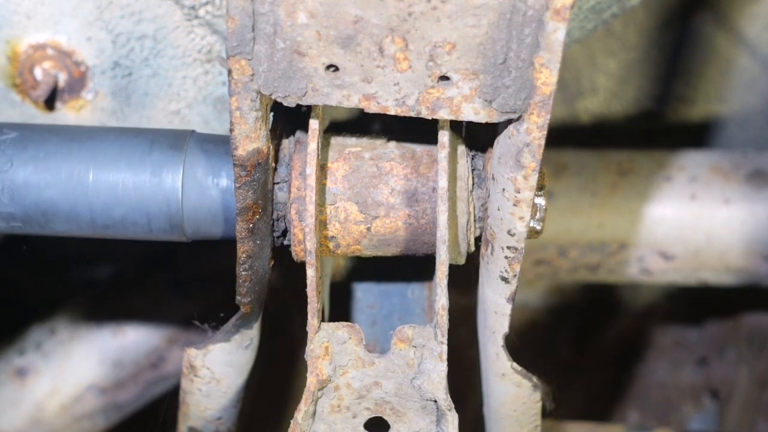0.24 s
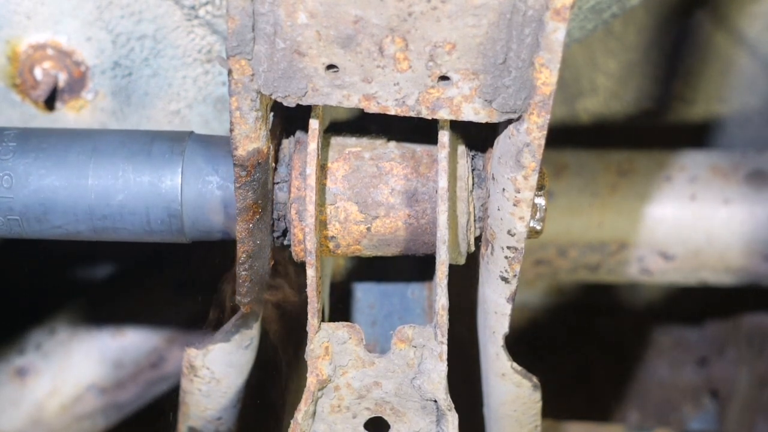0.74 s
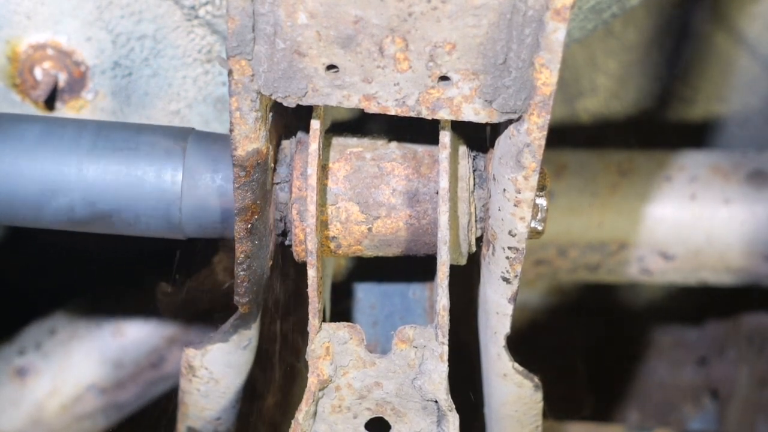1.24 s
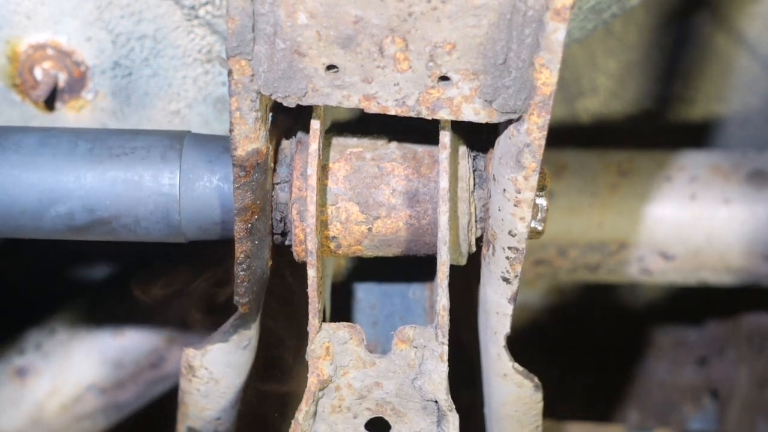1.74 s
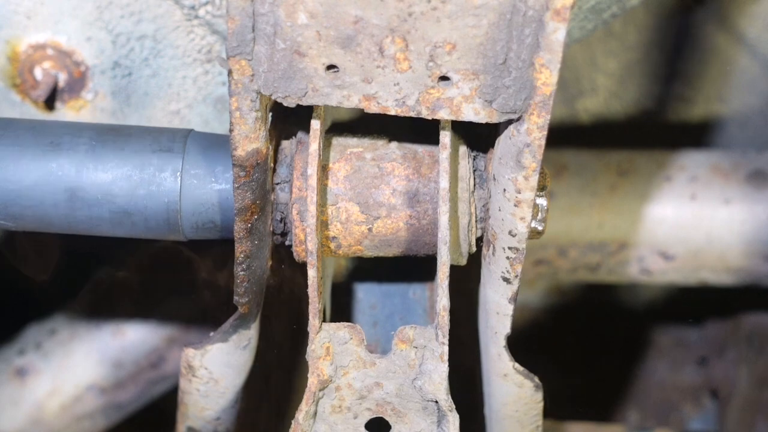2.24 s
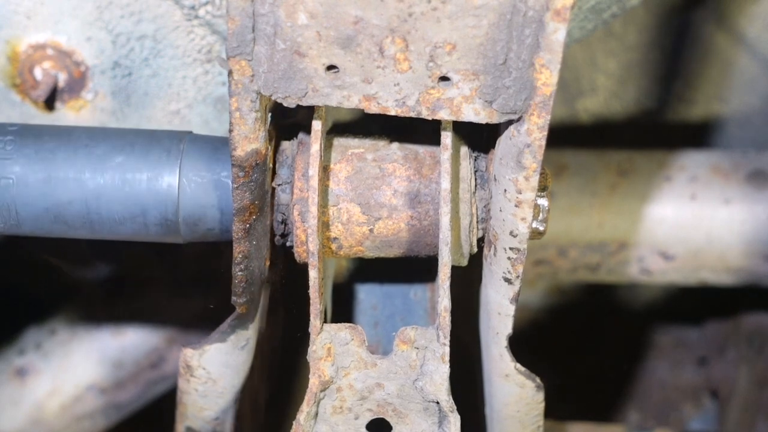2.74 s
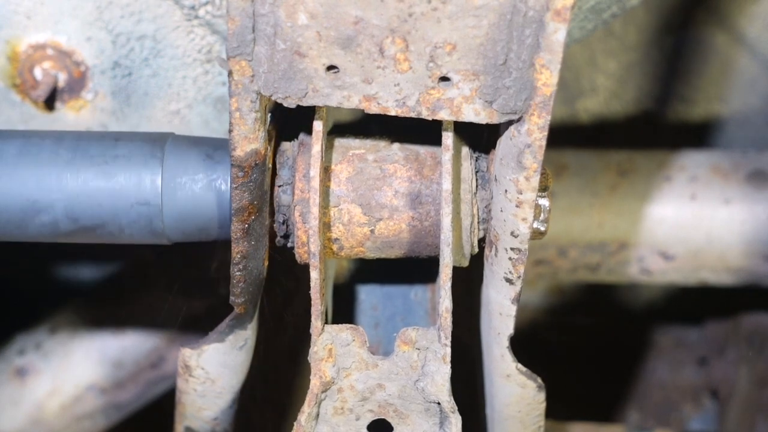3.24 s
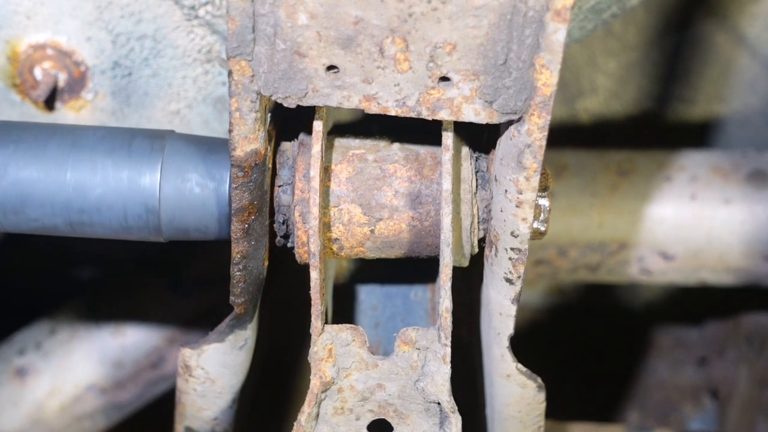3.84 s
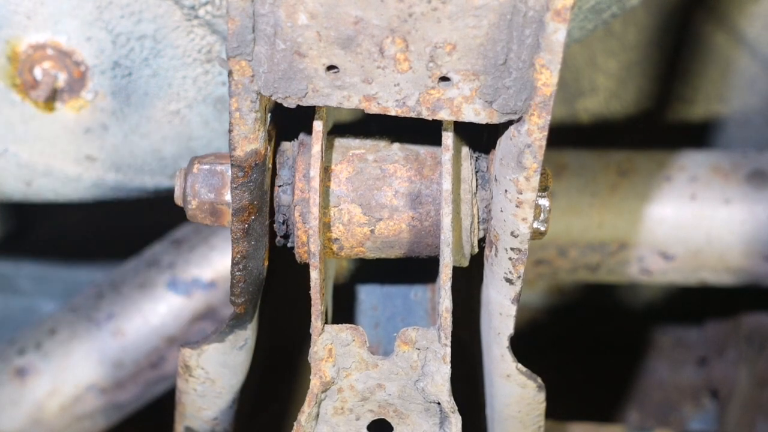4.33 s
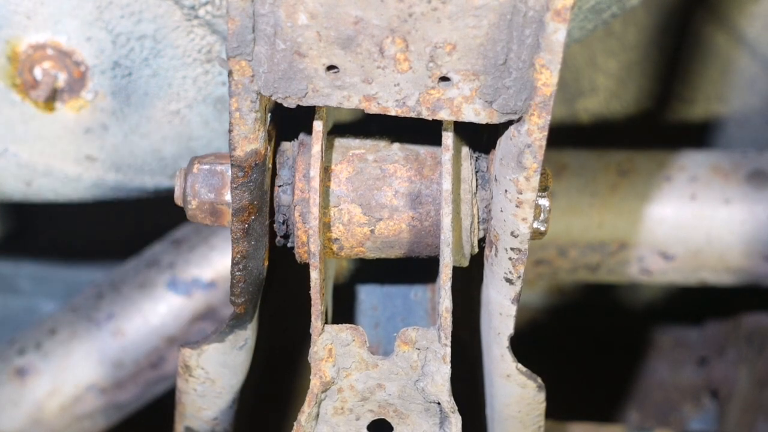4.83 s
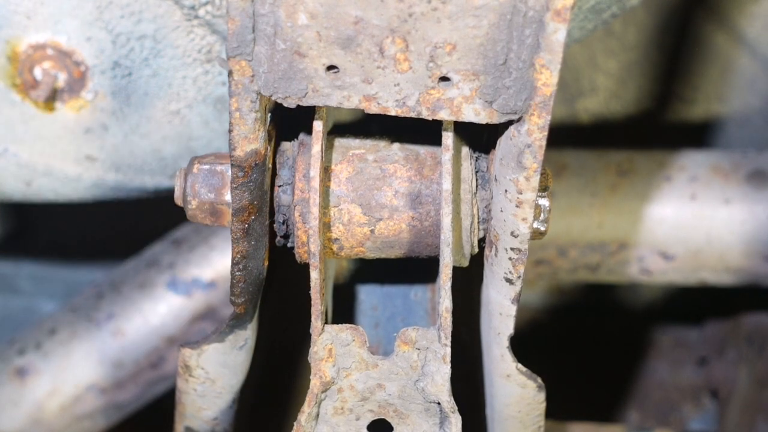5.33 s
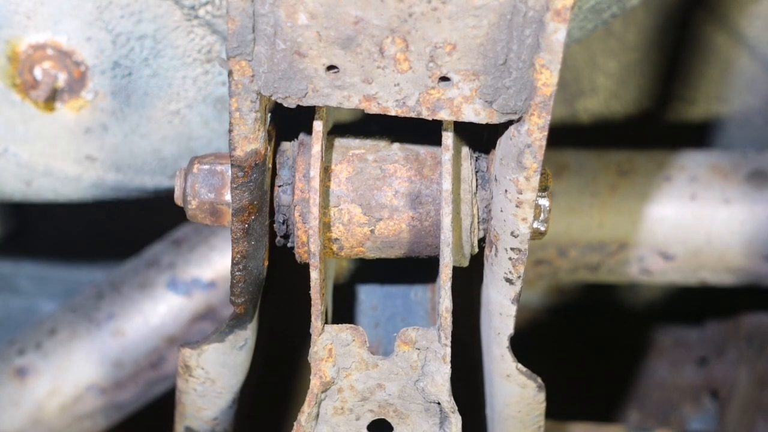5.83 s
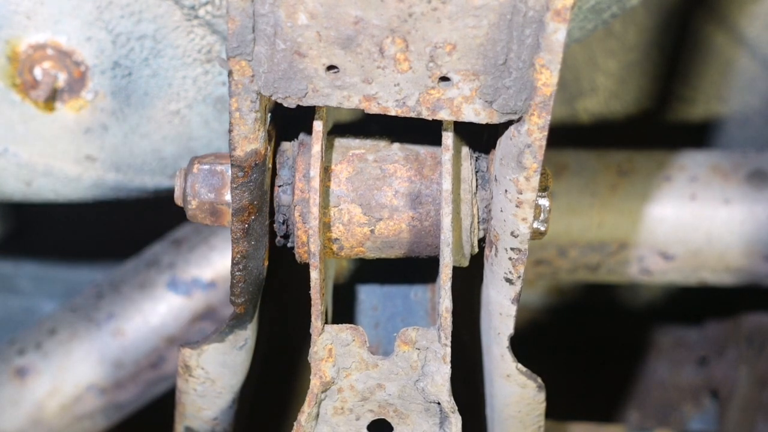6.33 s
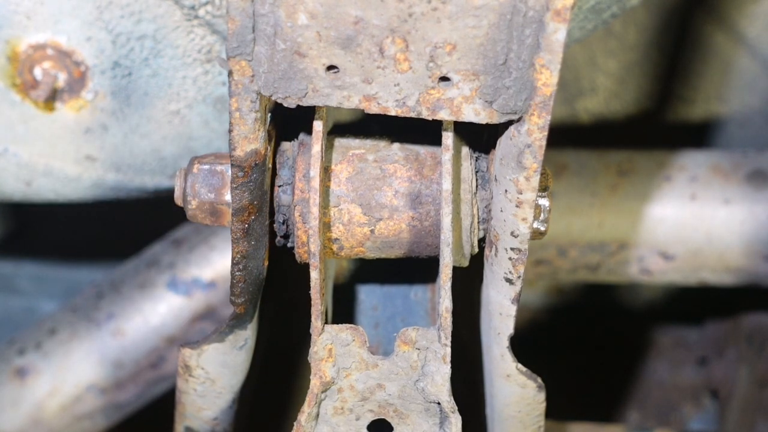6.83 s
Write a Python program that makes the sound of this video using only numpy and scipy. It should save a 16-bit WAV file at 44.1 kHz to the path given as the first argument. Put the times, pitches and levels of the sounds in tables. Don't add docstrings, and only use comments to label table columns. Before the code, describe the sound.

A close microphone in a garage catches faint clinks, then at 0.1 s an impact wrench spins up and hammers a rusty seized bolt, blows quickening into a harsh, clipped metallic roar until 0.6 s. A second full-throttle run fills 0.75-1.3 s. A brief nudge at 1.3 s gives a few slack knocks. From 1.8 to 3.2 s come feathered bursts, slower separate cracks with gear whine, a ringing frame, loose rattle and a humming plate. Near quiet follows; around 3.7-4 s the socket is pulled off with tiny squeaks, clinks and scrapes. At 4.05 s the room hiss jumps up. Fingers pop on the camera at 4.3 s; a knock lands at 4.6, a hard drop with low shudder at 5.05, clattering and scraping at 5.35-5.5. Scattered bumps follow, then a bright tap at 6.56, busy knocks, rasping drag and a last hard clank at 6.94 s.

```python
import sys
import numpy as np
from scipy import signal
from scipy.io import wavfile

SR = 44100
rng = np.random.default_rng(int(sys.argv[2]) if len(sys.argv) > 2 else 0)


def makeup_ratio(level_db):
    decades = np.asarray(level_db, float) / 20
    return 10 ** decades


def to_wav(sig):
    pcm = np.clip(np.atleast_2d(sig), -1, 1) * 32767
    pcm = np.round(pcm).astype(np.int16)
    wavfile.write(sys.argv[1], SR, pcm.T)


N = 311787

CUT_S = 4.05

# frequency in Hz, level in dB.
QUIET_TONE = [(15, -42), (25, -9), (97, 7.5), (373, 0), (1260, -3.5), (4370, -12), (5730, -27.5),
              (16000, -29)]
LOUD_TONE = [(15, -66), (25, -6.5), (97, -0.5), (161, 0), (206, -5), (503, -10.5), (1700, -20), (2160, -19),
             (2760, -16), (16000, -27)]
QUIET_TONE_DB, LOUD_TONE_DB = -81, -68.5
# frequency in Hz, t60 in seconds.
GARAGE_T60 = [(150, 0.8), (500, 0.4), (1500, 0.34), (3500, 0.42), (7000, 0.42), (14000, 0.3)]
# time in seconds, level in dB.
SHUDDER_LEVEL = [
    (4.95, -95),
    (5.1, -70),
    (5.3, -53),
    (5.42, -70),
    (5.6, -95),
]
# time in seconds, level in dB.
FINGER_POPS = [(4.26, -56), (4.272, -51), (4.311, -62.5), (4.326, -43.5), (4.369, -51), (4.376, -33.5),
               (4.383, -61), (4.393, -51.5), (4.419, -41), (4.432, -41.5)]

# frequency in Hz, level in dB.
SHUFFLE_COLOUR = [(18, -44.5), (30, -24), (255, -3), (454, 0), (520, -1.5), (1390, -30.5), (1590, -16),
                  (3000, -28.5), (3900, -39.5), (6600, -120)]
GRIT_COLOUR = [(120, -50), (200, -40), (447, -9.5), (579, -7), (1000, -9), (1500, -12), (2610, -17),
               (4800, -24), (6000, -33), (12000, -48), (15600, -77), (22000, -120)]
# hardest moment in seconds, seconds to swell 20 dB, seconds to fade 20 dB,
# low shuffle in dB, gritty scrape in dB.
STROKES_OF_TOOLS = [(3.685, .015, .16, -73, -57), (3.93, .02, .2, -75, -64), (4.055, .005, .2, -63, -60),
                    (4.62, .01, .3, -66, -70), (4.92, .12, .3, -68, -62), (5.06, .01, .4, -54, -50),
                    (5.36, .01, .21, -52, -33), (5.52, .01, .2, -56, -43), (6.27, .12, .3, -63, -53),
                    (6.8, .18, .3, -52, -48), (6.93, .2, .3, -49, -48)]
SHUFFLE_FOLLOWS = 0.6
# from and to in seconds, shuffle from and to in dB, scrape from and to in dB.
FIDGETING = (4.05, 5.3, -80, -65, -74, -63)

# frequency in Hz, level in dB.
CONCRETE_TICK = [(300, -29), (1500, 0), (3500, -0.5), (6000, -4.5), (9000, -11), (16000, -26)]
# time in seconds, level in dB, body in Hz.
DULL_BUMPS = [(3.597, -58, 950), (3.669, -63, 950), (3.913, -59.5, 840), (5.874, -49, 470),
              (5.901, -45, 382), (6.188, -45, 740), (6.211, -44, 760), (6.219, -46, 800), (6.226, -46, 900),
              (6.232, -41, 1000), (6.241, -44, 850), (6.36, -52, 620), (6.397, -48, 640), (6.604, -40, 950),
              (6.616, -42, 1000), (6.681, -37, 970), (6.695, -39, 1050), (6.706, -39, 1050),
              (6.717, -35.5, 942), (6.739, -37, 1030), (6.745, -37, 1030), (6.755, -36, 800),
              (6.786, -31, 1000), (6.806, -35, 1000), (6.812, -36, 1050), (6.825, -34, 990),
              (6.832, -36, 1000), (6.85, -39, 1000), (6.872, -40, 950), (6.897, -38, 1100),
              (6.904, -29.5, 900), (6.93, -27, 1050), (7.025, -33, 778), (7.038, -36, 800),
              (7.05, -26.5, 960)]
BUMP_TREBLE_DB, BUMP_TREBLE_HZ = -33, 2200
# time in seconds, level in dB, body in Hz, treble in dB, treble in Hz.
TOOL_CLINKS = [(.039, -63, 1130, -62, 2200), (.047, -63, 800, -64, 1700), (.083, -60, 755, -63, 2350),
               (3.548, -72, 900, -76, 1500), (3.571, -76, 1220, -71, 3870), (3.713, -55, 608, -47, 2280),
               (3.753, -48, 650, -49, 4280), (3.98, -60, 1080, -66, 2400), (3.991, -60, 1150, -66, 3200),
               (4.049, -54, 1120, -58, 3160), (5.736, -44, 662, -53, 2400), (5.81, -46, 900, -54, 3440),
               (5.936, -38.5, 870, -46, 3260), (6.074, -52, 544, -52, 5400), (6.259, -60, 1100, -52, 6200),
               (6.659, -45, 824, -52, 2660)]
# time in seconds, level in dB, crack in dB, t60 of the clatter in seconds, ring in dB.
HEAVY_DROPS = [
    (4.606, -24, -31, 0.035, -5),
    (5.045, -5, -28, 0.06, -2),
    (5.3445, -19, -50, 0.03, -5),
    (5.3495, -12, -38, .06, -5),
    (5.503, -21, -38, .12, -6),
    (6.282, -26, -38, 0.04, -2),
    (6.5574, -19, -46, 0.04, 1),
    (6.9426, -11, -33, 0.015, -5),
]
# frequency in Hz, width in Hz, level in dB.
DROPPED_PARTS = [
    [(608, 120, 8), (1320, 140, 7), (2670, 120, 9), (3540, 48, -17), (5400, 22, -35), (6260, 42, -10.5)],
    [(410, 50, -1), (530, 90, -13), (655, 16, 1), (770, 18, 2), (958, 20, 0), (1238, 24, -2),
     (1500, 60, -8), (1820, 50, -9), (2444, 60, -12), (3068, 40, -19), (3650, 18, -22), (4600, 40, -24),
     (6000, 160, -27)],
    [(390, 30, 5), (657, 30, 0), (840, 30, -2), (1200, 40, -7), (2400, 130, -16)],
    [(390, 25, 2), (657, 18, 0), (840, 14, -3), (1200, 30, -4), (1733, 45, -8), (2500, 80, -11),
     (3900, 200, -8), (4700, 150, -12), (5600, 300, -22)],
    [(600, 80, -4), (1230, 90, 0), (2310, 150, -6), (4000, 200, -14), (7000, 300, -16)],
    [(1000, 90, -1), (2100, 200, 0), (2800, 90, 0), (3200, 110, 1), (4550, 70, 0), (6600, 200, -4),
     (11000, 400, -10)],
    [(964, 32, 4), (1136, 45, 5), (1696, 45, -10), (2891, 60, -12), (3042, 50, -8), (4400, 90, -10),
     (5308, 90, -14), (6395, 90, -19), (7400, 300, -32)],
    [(900, 200, 4), (1280, 98, 6.5), (2600, 200, -5), (3400, 200, -3), (4500, 250, -3), (5300, 90, 3),
     (6600, 200, -14), (9300, 150, -12), (11500, 300, -28)],
]

# start in seconds, length in seconds, from Hz, to Hz, level in dB.
GLIDING_SQUEAKS = [
    (1.797, .04, 550, 1450, -56),
    (3.675, .04, 650, 1500, -60),
    (3.757, .045, 850, 550, -61),
    (3.925, .08, 650, 1200, -67),
]

# pressed in seconds, let go in seconds, top mesh in Hz, rattle in dB, whine in dB.
TRIGGER_PULLS = [
    (.07, .59, 3800, -28, -31),
    (.71, 1.15, 3800, -29, -33),
    (1.3, 1.54, 1800, -48, -64),
    (1.799, 1.84, 1900, -90, -47),
    (1.83, 2.06, 2500, -34, -48),
    (2.16, 2.56, 2600, -32, -47),
    (2.64, 2.98, 2500, -41, -50),
    (2.93, 3.2, 2700, -42, -49),
    (3.665, 3.712, 2000, -90, -58),
]
IDLE_HZ = 500
FREE_SHARE, FREE_S, LOADED_S, COAST_S = 0.55, 0.05, 0.25, 0.3
BITE_S, RATTLE_RISE_S, RATTLE_POWER = 0.05, 0.085, 2.2
RATTLE_FALL_DB_PER_S, STOP_DB_PER_S2 = 55, 280
WHINE_DB_PER_KHZ, WHINE_FALL_DB_PER_S = 14, 80
# frequency in Hz, level in dB.
WINDAGE_COLOUR = [(250, -25), (700, -2), (1500, 0), (2800, -2), (3500, -10), (4600, -7), (6000, -16),
                  (16000, -40)]

# frequency in Hz, width in Hz, level in dB.
FRAME_MODES = [(647, 22, 0), (864, 26, 1), (915, 20, 0), (1070, 28, 5), (1383, 22, 1), (1486, 30, -3),
               (1725, 20, 0), (1902, 26, -3), (2235, 35, -2), (2390, 24, -3), (3397, 18, -4),
               (3715, 26, -5), (4008, 26, -6), (4180, 26, -4)]
RESEATED_MODES = [(655, 14, -3), (840, 25, -6), (1060, 22, -2), (1725, 22, -2), (1920, 24, -6),
                  (2390, 30, -10), (3400, 25, -14), (4180, 40, -10), (4900, 80, -14)]
LOOSENED_MODES = [(662, 45, 0), (840, 49, -1), (1070, 62, 0), (1720, 37, -1), (1900, 52, -3),
                  (2200, 62, -6), (2500, 44, -5), (2830, 87, -7), (3230, 55, -8), (4200, 150, -9),
                  (4970, 22, -10)]
RESEAT_S, LOOSEN_S = 1.8, 2.65
# frequency in Hz, width in Hz, level in dB.
SLACK_PLATE = (402, 3.8, -9.5)
# frequency in Hz, width in Hz, level in dB.
ANVIL_MODES = [(6200, 120, -19.5), (7000, 54, 0), (7240, 69, 3.5), (8390, 48, 4.5), (9980, 75, 6)]
# frequency in Hz, level in dB.
CRACK_COLOUR = [(300, -24), (1500, 3.5), (3000, 2.5), (4300, 5), (5400, 3), (6300, -4), (10000, -7),
                (16000, -19.5)]
# frequency in Hz, level in dB.
LOOSE_COLOUR = [(35, -72), (60, -12), (238, -15), (566, -7.5), (651, -4), (900, -2.5), (1070, -.5),
                (1400, -8), (2200, -10), (4970, -16.5), (16000, -56.5)]
# time in seconds, crack in dB, frame ring in dB.
THROTTLE_BLOWS = [(0.157, -26, -28), (0.2004, -24, -28), (0.2334, -25, -28), (0.2588, -25, -28),
                  (0.2848, -27, -28), (0.3057, -24, -28), (0.3244, -24, -28), (0.3434, -28, -28),
                  (0.3616, -26, -28), (0.3805, -23, -28), (0.3985, -23, -28), (0.417, -24, -28),
                  (0.4354, -23, -28), (0.4534, -23, -28), (0.4694, -26, -28), (0.4854, -23, -28),
                  (0.5024, -24, -28), (0.5194, -23, -28), (0.5374, -23, -28), (0.5554, -24, -28),
                  (0.5824, -27, -28), (0.623, -26, -28), (0.826, -26, -28), (0.8639, -24, -28),
                  (0.8929, -24, -28), (0.9173, -23, -28), (0.9398, -25, -28), (0.9627, -25, -28),
                  (0.9794, -24, -28), (1.0011, -25, -28), (1.0184, -24, -28), (1.0374, -24, -28),
                  (1.0564, -23, -28), (1.0734, -25, -28), (1.0894, -25, -28), (1.1054, -25, -28),
                  (1.1238, -25, -28), (1.1414, -27, -28), (1.1588, -24, -28), (1.1772, -22, -28),
                  (1.1954, -24, -28), (1.2144, -25, -28), (1.2334, -25, -28), (1.2535, -25, -28),
                  (1.2775, -25, -28), (1.3124, -31, -28)]
RUN_LIFT_DB, TOP_GAP_S = 7, 0.017
CRACK_PER_SPEED = 0.9
# time in seconds, crack in dB, frame ring in dB.
FEATHERED_BLOWS = [(1.9031, -22, -39), (1.943, -27, -24.5), (1.9739, -23, -30), (2.0194, -31.5, -29),
                   (2.2882, -27, -28.5), (2.3286, -25, -25), (2.361, -24, -28.5), (2.3989, -26.5, -29),
                   (2.4374, -28, -26), (2.4693, -25.5, -26), (2.4982, -23.5, -31), (2.5247, -23, -27),
                   (2.5501, -24, -34), (2.589, -29.5, -28), (2.796, -26, -27.5), (2.8379, -24.5, -27),
                   (2.8739, -22.5, -27.5), (3.0674, -26.5, -30)]
REBOUND_S, REBOUND_CRACK_DB, REBOUND_FRAME_DB = 0.023, -17, -14
# time in
# seconds, crack in dB, frame ring in dB.
SLACK_AND_STRAY_BLOWS = [(.1304, -70, -36.5), (.172, -32, -34), (.7547, -29, -34), (.7764, -32, -28),
                         (1.315, -45, -27), (1.3728, -30, -24), (1.3922, -38.5, -38.5), (1.5399, -41, -42),
                         (1.8367, -35, -36.5), (1.8781, -43.5, -31), (2.0354, -37, -30.5), (2.1254, -46, -35.5),
                         (2.2104, -56, -35.5), (2.2223, -26.5, -30), (2.2384, -47, -31), (2.7065, -40, -45),
                         (2.7177, -31, -33), (2.7402, -35.5, -29.5), (2.7731, -36.5, -38.5), (2.8654, -46, -28.5),
                         (3.015, -30, -28), (3.0797, -38, -27), (3.1827, -37.5, -41)]

CEILING_DB, SAG_FROM_DB, SAG_SLOPE, SAG_S = -24, -33, 0.48, 0.022
GATE_FROM_DB, GATE_SLOPE, GATE_MIDDLE_S, GATE_UNTIL_S = -56, 0.4, 2, 3.56
# frequency in Hz, level in dB.
AFTER_CLIP_COLOUR = [(30, -15.5), (150, -2.5), (500, 0.5), (4000, -0.5), (10000, 0.5), (15000, 2.5),
                     (16600, -11)]


def evened(x):
    return x / np.sqrt(np.mean(x ** 2) + 1e-20)


def read(points, hz):
    f, value = np.transpose(points)
    return np.interp(np.log(hz + 1), np.log(f + 1), value)


def taps_of(points):
    gain_db = np.maximum(read(points, abs(np.fft.fftfreq(4096, 1 / SR))), -100)
    log_gain = np.log(makeup_ratio(gain_db))
    phase = signal.hilbert(log_gain).imag
    taps = np.fft.ifft(np.exp(log_gain - 1j * phase)).real[:2048]
    return taps / np.linalg.norm(taps)


def coloured(x, points):
    x = np.atleast_2d(x)
    return signal.fftconvolve(x, taps_of(points)[None], axes=1)[:, :x.shape[1]].squeeze()


def add(mix, s, sound):
    part = mix[round(s * SR):][:len(sound)]
    part += sound[:len(part)]


def resonate(x, hz, width):
    turn = np.exp(2j * np.pi * np.cumsum(hz * np.ones(len(x))) / SR)
    r = np.exp(-np.pi * width / SR)
    return 2 * (turn * signal.lfilter([1 - r], [1, -r], x / turn)).real


def ring(modes, t, detune):
    hz, db, t60 = np.transpose(modes)[:, :, None]
    luck, phase, off = rng.random((3, len(modes), 1))
    cycles = hz * (1 + detune * (2 * off - 1)) * t + phase * (hz > 2000)
    decay = np.exp(-np.log(1000) * t / t60)
    x = (makeup_ratio(db - 2.3 * luck) * decay * np.sin(2 * np.pi * cycles)).sum(0)
    return x / abs(x).max()


def burst(t, rise, t60):
    return (1 - np.exp(-t / rise)) * makeup_ratio(-60 * t / t60)


def grains(per_s, spread_db):
    size_db = spread_db * np.minimum(rng.exponential(1, N), 4)
    size = makeup_ratio(size_db) * rng.choice([-1, 1], N)
    return size * (rng.random(N) < per_s / SR)


def clank(modes, t, t60, ring_db):
    first_hz, _, first_db = modes[0]
    last_hz, _, last_db = modes[-1]
    colour = [(0.28 * first_hz, first_db - 22)] + [(f, d) for f, w, d in modes]
    colour += [(2.3 * last_hz, last_db - 20), (20000, last_db - 56)]
    rattle = rng.standard_normal(len(t)) * burst(t, 0.00048, t60)
    contact = t == 0
    clatter = coloured(contact + 1.8 * rattle / np.linalg.norm(rattle), colour)
    lasting = ring([(f, d, 2.43 / (w + 4)) for f, w, d in modes] * 2, t, 0.012)
    return clatter / abs(clatter).max() + makeup_ratio(ring_db) * lasting


def room_tone(early):
    noise = rng.standard_normal(N)
    quiet = makeup_ratio(QUIET_TONE_DB) * coloured(noise, QUIET_TONE)
    loud = makeup_ratio(LOUD_TONE_DB) * coloured(noise, LOUD_TONE)
    return np.where(early, quiet, loud)


def garage(x):
    out = np.zeros(N)
    turns_per_s = np.where(np.arange(N) < CUT_S * SR, 11, 37)
    turn = np.cumsum(turns_per_s) / SR
    for k in range(3):
        taps = np.zeros(SR)
        at = np.arange(250, SR - 20, 20)
        taps[at + rng.integers(0, 20, len(at))] = rng.choice([-1., 1.], len(at))
        hz, t, z = signal.stft(taps, SR, nperseg=256)
        decay = makeup_ratio(-60 * t / read(GARAGE_T60, hz)[:, None])
        tail = signal.istft(z * decay, SR, nperseg=256)[1]
        share = np.sqrt(2 / 3) * np.cos(np.pi * (turn + k / 3))
        out += signal.fftconvolve(x * share, tail / np.linalg.norm(tail))[:N]
    return out


def shudder():
    s, db = np.transpose(SHUDDER_LEVEL)
    band = signal.butter(2, [25, 120], "band", fs=SR)
    rumble = signal.lfilter(*band, rng.standard_normal(N))
    return evened(rumble) * makeup_ratio(np.interp(np.arange(N) / SR, s, db, -120, -120))


def pops():
    out, t = np.zeros(N), np.arange(600) / SR
    swing = 0.98 * np.sin(2 * np.pi * 330 * t) * np.exp(-t / 0.0016)
    push = swing - np.exp(-t / 0.00011)
    for s, db in FINGER_POPS:
        add(out, s + 0.0015, makeup_ratio(db - 1) * push)
    return out


def effort():
    t = np.arange(N) / SR
    s, swell, fade, low_db, grit_db = np.transpose(STROKES_OF_TOOLS)[:, :, None]
    down_db = -20 * np.maximum((s - t) / swell, (t - s) / fade)
    steady_low = makeup_ratio(np.interp(t, FIDGETING[:2], FIDGETING[2:4], -120))
    steady_grit = makeup_ratio(np.interp(t, FIDGETING[:2], FIDGETING[4:], -120))
    low = steady_low + makeup_ratio(low_db + SHUFFLE_FOLLOWS * down_db).max(0)
    return low, steady_grit + makeup_ratio(grit_db + down_db).max(0)


def dragging():
    low_gain, grit_gain = effort()
    t = np.arange(N) / SR
    low = evened(coloured(grains(900, 4.8), SHUFFLE_COLOUR)) * low_gain * makeup_ratio(-2.5)
    grit = coloured(grains(1100, 2.7), GRIT_COLOUR)
    pitch = 1.8 * evened(resonate(grit, 1020, 300)) + 0.45 * evened(resonate(grit, 2300, 1200))
    rasp = evened(grit) + pitch * (t > 6.6)
    return low + rasp * grit_gain * makeup_ratio(-4.5)


def knocks():
    out, t = np.zeros(N), np.arange(4000) / SR
    rows = [(s, db, hz, db + BUMP_TREBLE_DB, BUMP_TREBLE_HZ) for s, db, hz in DULL_BUMPS]
    rows = rows + list(TOOL_CLINKS)
    soft_tick = list(CONCRETE_TICK[:4]) + [(9000, -18), (16000, -36)]
    ticks = coloured(rng.standard_normal((len(rows), len(t))), soft_tick) * burst(t, 0.00027, 0.038)
    for (s, db, hz, treble_db, treble_hz), tick in zip(rows, ticks):
        body = clank([(hz, 170, 0)], t, 0.022, ring_db=1.5)
        clink = clank([(treble_hz, 200, 0)], t, 0.036, ring_db=-1)
        add(out, s + 0.001, makeup_ratio(db + 1) * body + makeup_ratio(treble_db) * (0.55 * clink + 0.44 * tick))
    return out


def drops():
    out, t = np.zeros(N), np.arange(9000) / SR
    noise = rng.standard_normal((len(HEAVY_DROPS), len(t)))
    cracks = coloured(noise, CONCRETE_TICK) * burst(t, 0.0006, 0.021)
    for (s, db, crack_db, t60, ring_db), modes, crack in zip(HEAVY_DROPS, DROPPED_PARTS, cracks):
        part = clank(modes, t, 0.95 * t60, ring_db)
        add(out, s, makeup_ratio(db - 4.5) * part + makeup_ratio(crack_db + 0.5) * crack)
    return out


def squeaks():
    out = np.zeros(N)
    for s, length, from_hz, to_hz, db in GLIDING_SQUEAKS:
        u = np.arange(0, 1, 1 / (length * SR))
        hz = from_hz + (to_hz - from_hz) * u
        air = rng.standard_normal(len(u))
        whistle = evened(resonate(resonate(air, hz, 200), hz, 200))
        add(out, s, makeup_ratio(db) * np.sin(np.pi * u ** 0.8) * whistle)
    return out


def trigger():
    t = np.arange(N) / SR
    pressed, let_go, top_hz, rattle_db, whine_db = np.transpose(TRIGGER_PULLS)[:, :, None]
    held = np.clip(t, pressed, let_go) - pressed
    after = np.maximum(t - let_go, 0)
    spin = 1 - FREE_SHARE * np.exp(-held / FREE_S) - (1 - FREE_SHARE) * np.exp(-held / LOADED_S)
    hz = IDLE_HZ + (top_hz - IDLE_HZ) * spin * np.exp(-after / COAST_S)
    stop_db = STOP_DB_PER_S2 * after ** 2
    slow_db = WHINE_DB_PER_KHZ * (top_hz - hz) / 1e3
    whine = (t > pressed) * makeup_ratio(whine_db - slow_db - WHINE_FALL_DB_PER_S * after - stop_db)
    bite = (1 - np.exp(-np.maximum(held - BITE_S, 0) / RATTLE_RISE_S)) ** RATTLE_POWER
    rattle = bite * makeup_ratio(rattle_db - RATTLE_FALL_DB_PER_S * after - stop_db)
    loudest = whine.argmax(0)
    return hz[loudest, np.arange(N)], whine.max(0), rattle.max(0)


def motor():
    t = np.arange(6000) / SR
    hz, whine_gain, rattle_gain = trigger()
    drive = grains(4000, 4.7)
    frame = sum(makeup_ratio(d - 30 * w * t) * np.sin(2 * np.pi * f * t) * w for f, w, d in FRAME_MODES)
    rattle = evened(coloured(drive, LOOSE_COLOUR)) + 1.3 * evened(signal.fftconvolve(drive, frame)[:N])
    mesh = evened(resonate(resonate(drive, hz, 1000), hz, 1000))
    mesh = mesh + 0.1 * evened(resonate(drive, 2 * hz, 1500))
    windage = 1.1 * coloured(rng.standard_normal(N), WINDAGE_COLOUR)
    return evened(rattle) * rattle_gain * makeup_ratio(-4) + (mesh + windage) * whine_gain


def blows():
    s, crack_db, frame_db = np.transpose(THROTTLE_BLOWS)
    gap = np.diff(s)
    nearest = np.minimum(np.append(gap, 1), np.append(1, gap))
    speed_db = 20 * np.log10(TOP_GAP_S / nearest)
    runs = list(zip(s, crack_db + RUN_LIFT_DB + CRACK_PER_SPEED * speed_db, frame_db))
    rebounds = [(s + REBOUND_S, c + REBOUND_CRACK_DB, f + REBOUND_FRAME_DB) for s, c, f in FEATHERED_BLOWS]
    return runs + list(FEATHERED_BLOWS) + rebounds + list(SLACK_AND_STRAY_BLOWS)


def frame_at(s):
    if s < RESEAT_S:
        return list(FRAME_MODES)
    return list(RESEATED_MODES if s < LOOSEN_S else LOOSENED_MODES) + [SLACK_PLATE]


def hammer():
    out, t, hits = np.zeros(N), np.arange(4500) / SR, blows()
    shape = (len(hits), len(t))
    cracks = coloured(rng.standard_normal(shape), CRACK_COLOUR) * burst(t, 0.0006, 0.038)
    chatters = coloured(rng.standard_normal(shape), LOOSE_COLOUR) * burst(t, 0.00089, 0.13)
    push = -np.sin(2 * np.pi * 1800 * t) * makeup_ratio(-60 * t / 0.0058)
    fade = np.cos(np.pi / 2 * t / t[-1])
    for (s, crack_db, frame_db), crack, chatter in zip(hits, cracks, chatters):
        anvil = ring([(f, db, 2.4 / (w + 200)) for f, w, db in ANVIL_MODES] * 4, t[:1500], 0.15)
        frame = ring([(f, db, 2.0 / (w + 6)) for f, w, db in frame_at(s)], t, 0.002)
        frame = frame * burst(t, 0.0006, 1.0)
        shim = ring([(1800, 0, 0.06)] * 3, t, 0.4)
        add(out, s + 0.0005, makeup_ratio(crack_db + 12.5) * 0.19 * anvil)
        add(out, s + 0.0005, makeup_ratio(crack_db + 5) * (0.52 * crack + 0.71 * push))
        add(out, s + 0.0005, fade * makeup_ratio(frame_db + 3.5) * (frame + 0.45 * chatter + 0.3 * shim))
    return out


def scene():
    wrench = hammer() + motor() + squeaks()
    high_pass = signal.butter(3, 330, "high", fs=SR)
    tools = signal.lfilter(*high_pass, knocks() + drops()) + dragging()
    echoes = garage(makeup_ratio(-4.5) * wrench + makeup_ratio(-4) * tools)
    return (wrench + tools + echoes + pops() + shudder())[None]


def overload(dry):
    over = dry / makeup_ratio(CEILING_DB)
    flat = makeup_ratio(CEILING_DB) * over / (1 + abs(over) ** 4) ** (1 / 4)
    keep = np.exp(-1 / (SAG_S * SR))
    power_db = 10 * np.log10(signal.lfilter([1 - keep], [1, -keep], flat ** 2) + 1e-12)
    sag_db = SAG_SLOPE * np.maximum(power_db - SAG_FROM_DB, 0)
    gated = abs(np.arange(N) / SR - GATE_MIDDLE_S) < GATE_UNTIL_S - GATE_MIDDLE_S
    gate_db = GATE_SLOPE * gated * np.maximum(GATE_FROM_DB - power_db, 0)
    return flat / makeup_ratio(sag_db + gate_db)


def top_cut(x):
    return signal.sosfilt(signal.butter(12, 16990, fs=SR, output="sos"), x)


def record(dry):
    early = np.arange(N) < CUT_S * SR
    captured = np.where(early, overload(dry), dry)
    mix = coloured(captured, AFTER_CLIP_COLOUR) + room_tone(early)
    return top_cut(mix[None])


dry = scene()
out = record(dry)
to_wav(out)
```